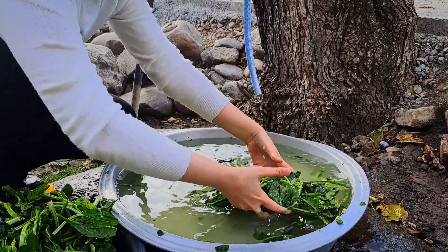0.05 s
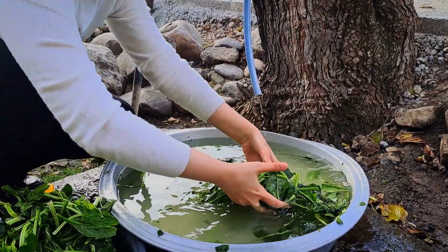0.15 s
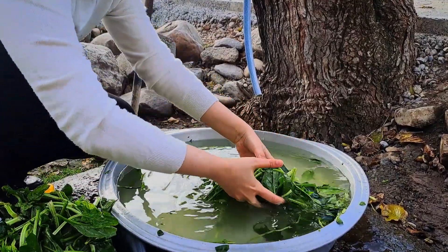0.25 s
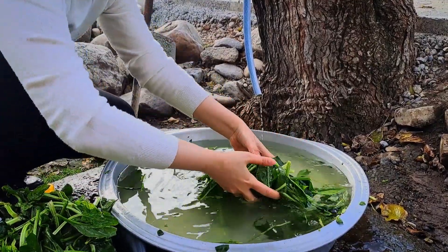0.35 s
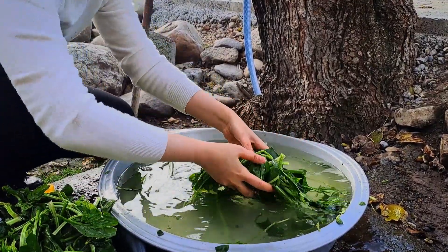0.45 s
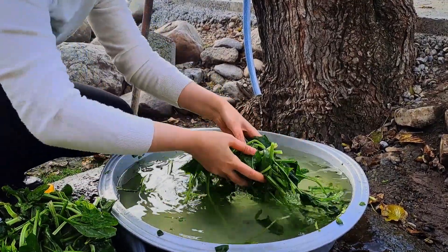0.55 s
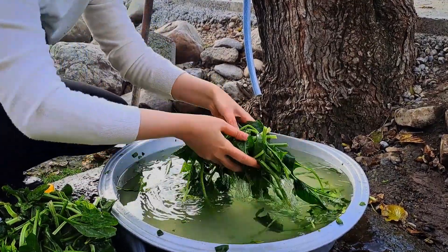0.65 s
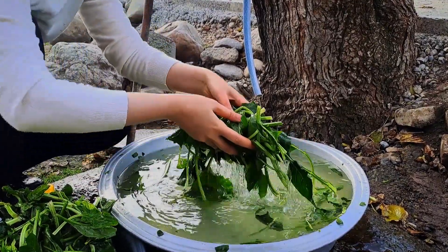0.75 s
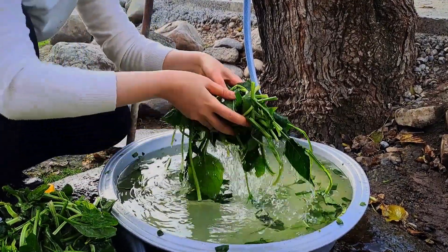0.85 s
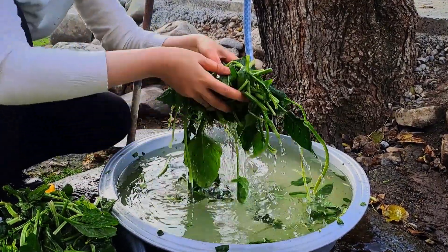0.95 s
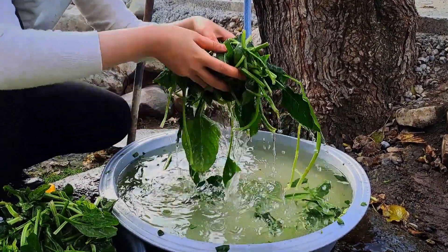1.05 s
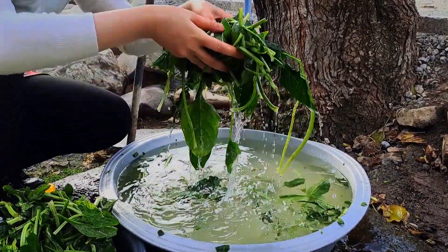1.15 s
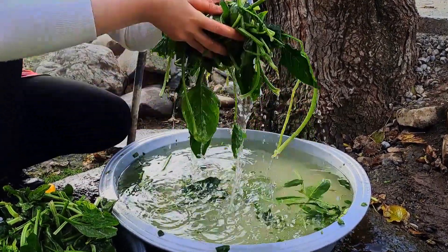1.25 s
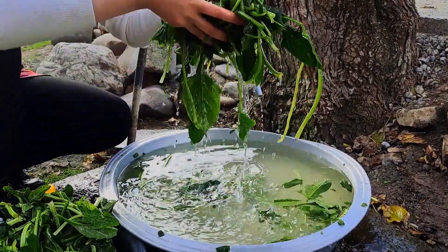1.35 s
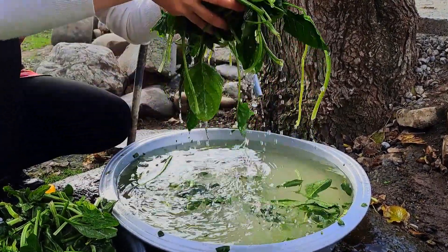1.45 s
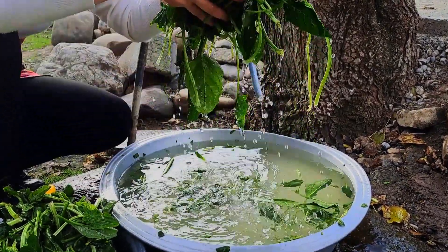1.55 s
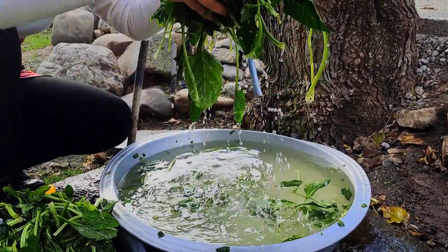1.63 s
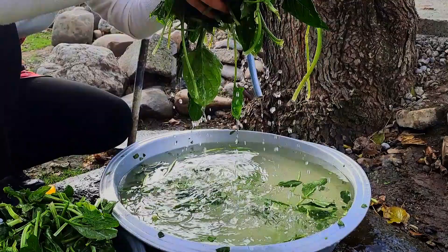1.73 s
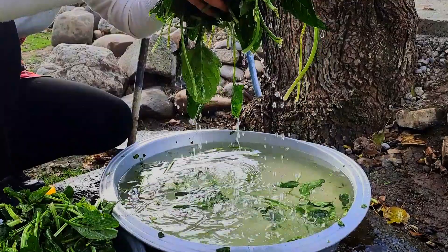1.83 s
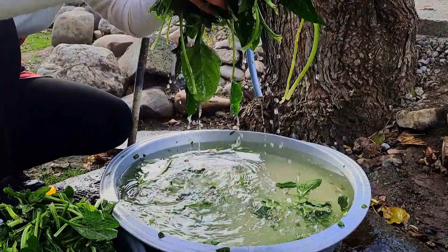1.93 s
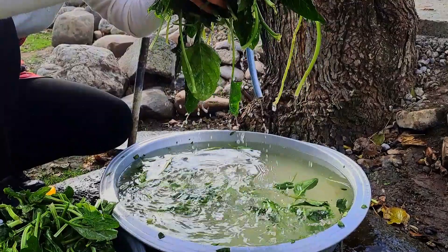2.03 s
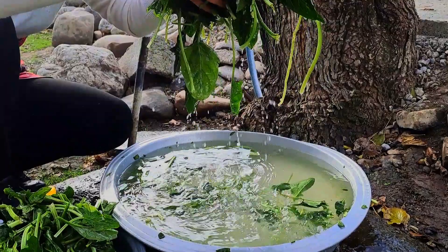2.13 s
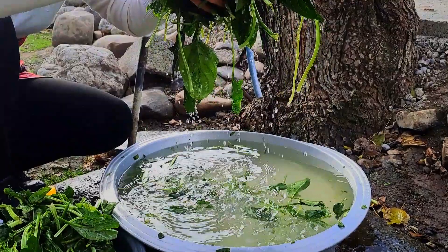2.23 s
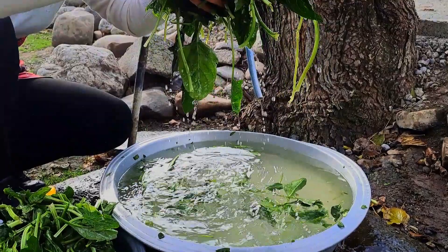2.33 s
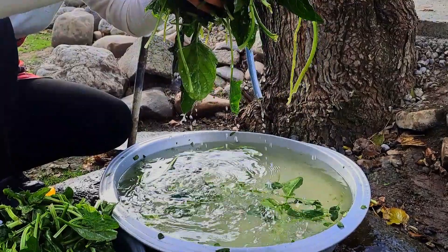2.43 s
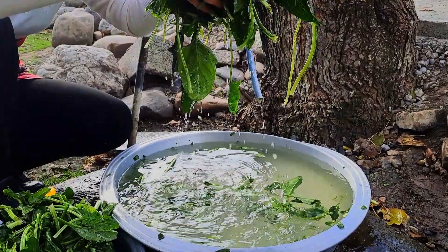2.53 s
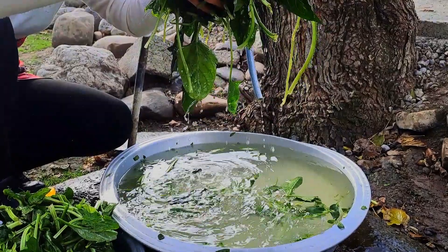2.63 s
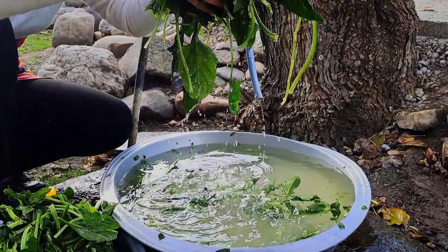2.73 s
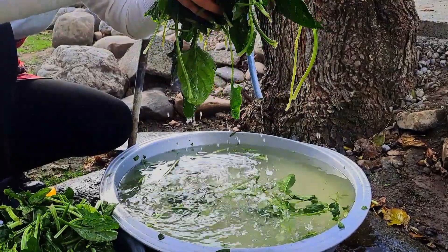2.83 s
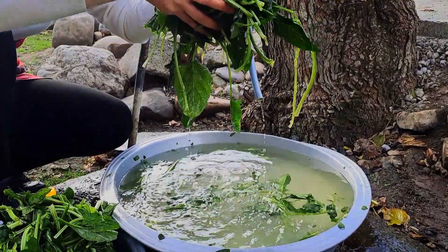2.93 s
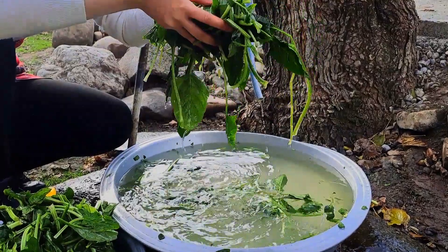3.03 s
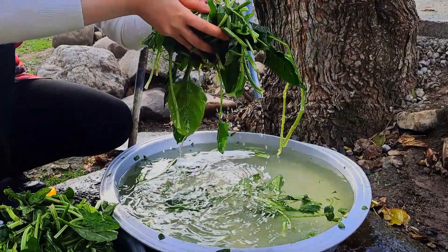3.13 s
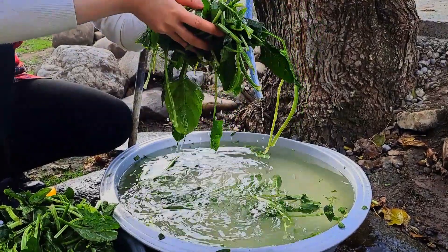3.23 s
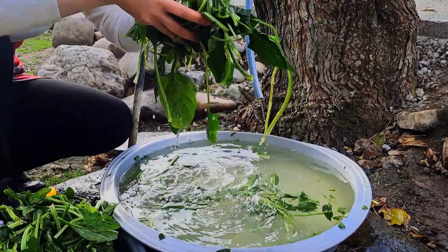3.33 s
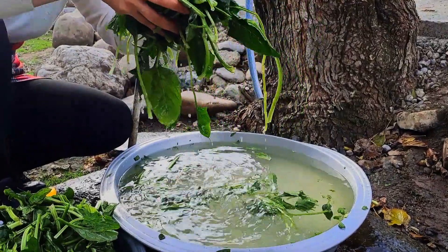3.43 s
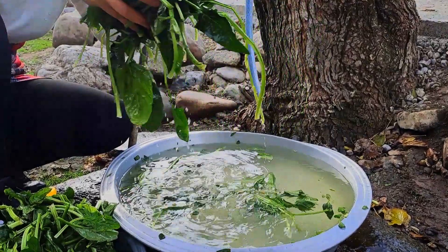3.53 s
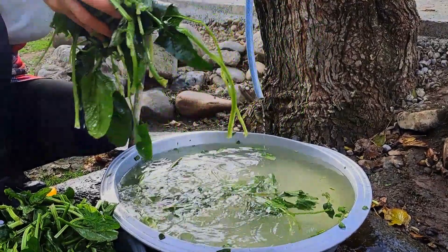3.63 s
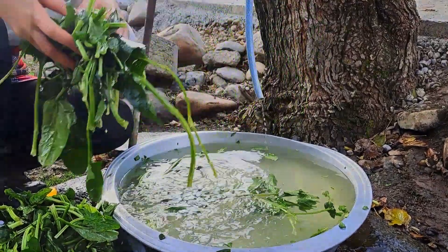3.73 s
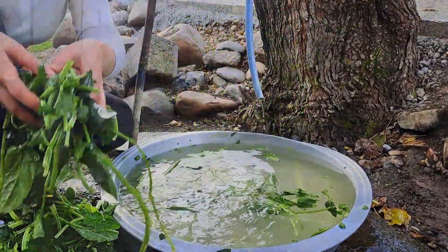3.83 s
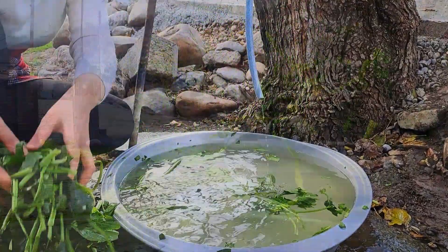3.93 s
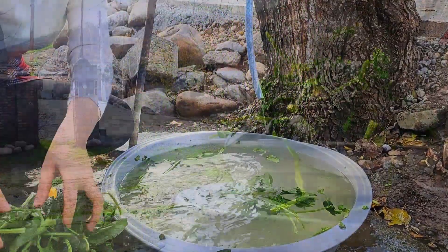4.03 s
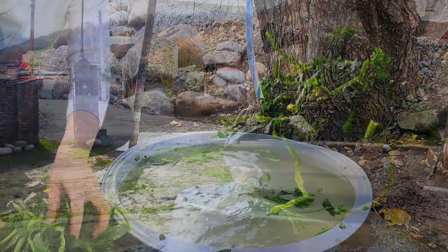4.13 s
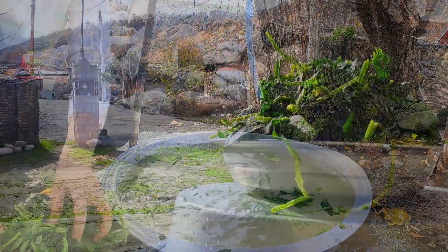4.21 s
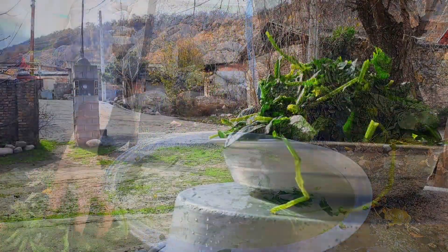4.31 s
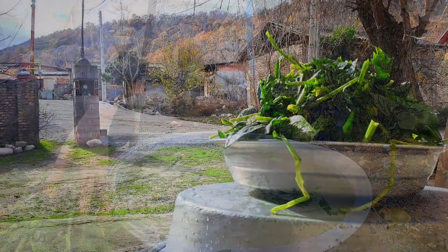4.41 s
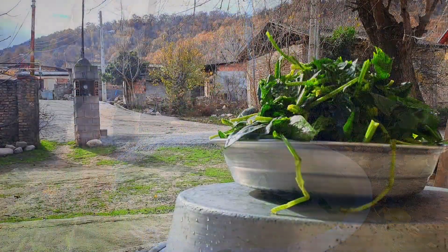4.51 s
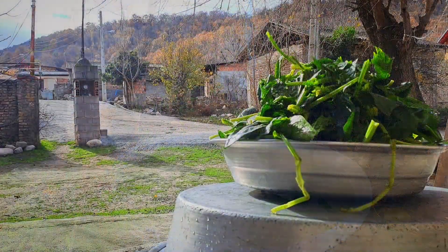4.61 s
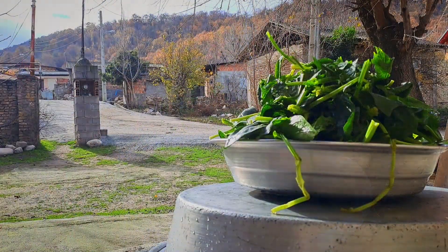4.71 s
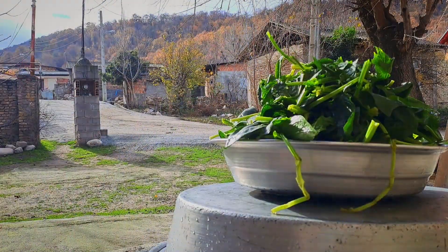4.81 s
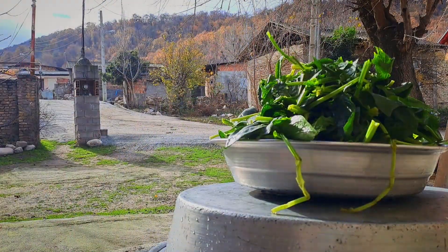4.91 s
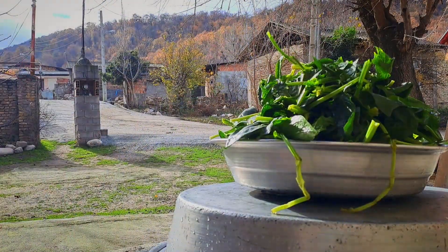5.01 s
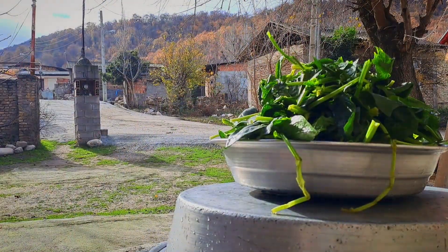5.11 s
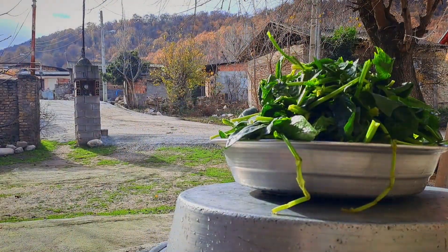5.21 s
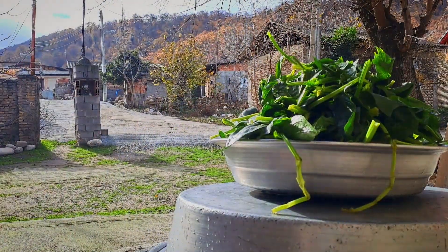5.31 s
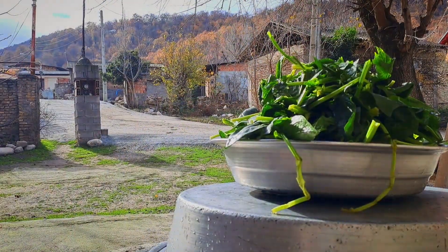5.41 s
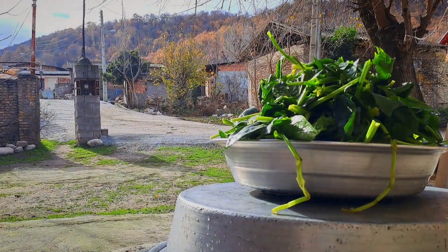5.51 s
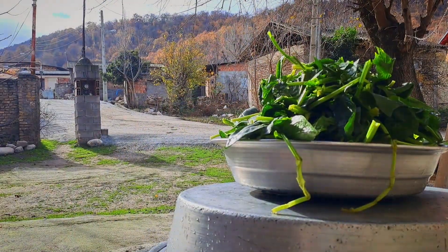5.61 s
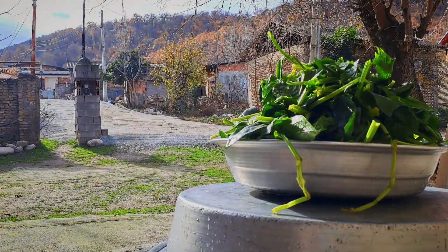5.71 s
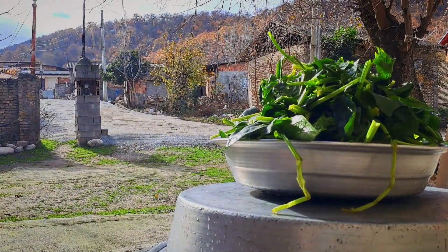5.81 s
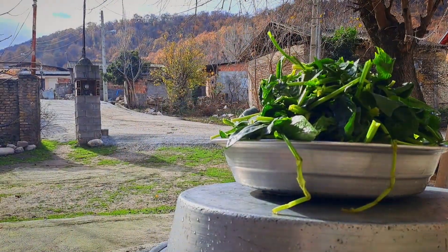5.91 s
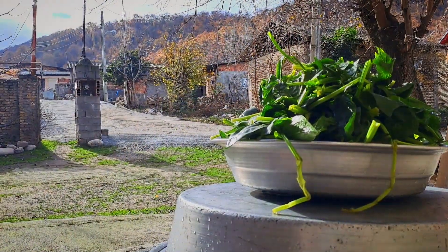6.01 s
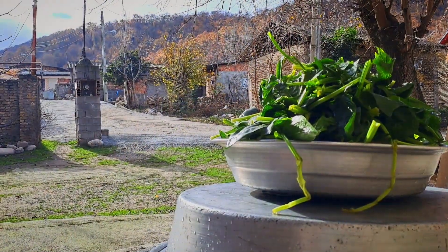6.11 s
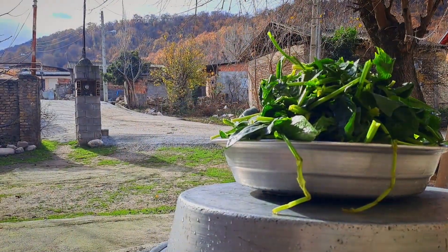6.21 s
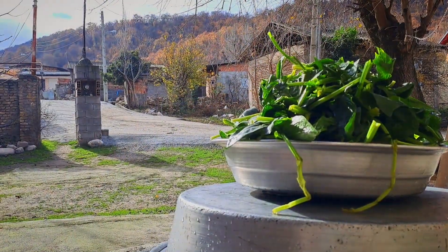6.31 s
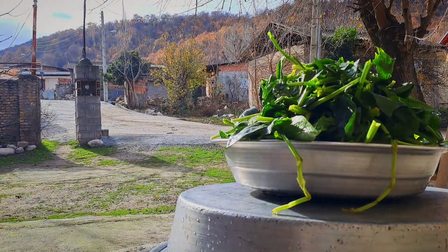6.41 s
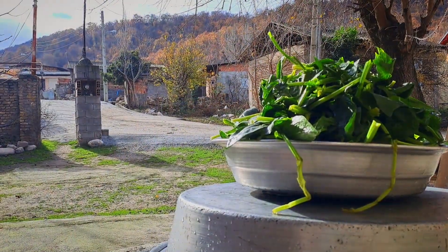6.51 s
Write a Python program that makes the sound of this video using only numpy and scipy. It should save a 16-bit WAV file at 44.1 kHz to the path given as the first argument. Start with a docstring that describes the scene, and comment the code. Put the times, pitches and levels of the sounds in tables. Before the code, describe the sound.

Leafy greens swish in a metal basin outdoors, lift out with streaming, splattering, gurgling water thinning to drips, then flop wetly onto a pile before quiet hum.

```python
"""A bunch of spinach swishes under water in a metal basin, outdoors over a low rumble, and is lifted out.
Water streams off in gushes: noise bursts spatter, sine bubbles gurgle, and resonances ring the basin.
The flow thins to single drips; near 4 s the wet bunch lands on a pile with a flop, rustle and snaps.
Ticks of the settling pile give way to a quiet yard of filtered noise, with a wisp of hiss and one chirp."""
import sys
import numpy as np
from scipy import signal
from scipy.fft import rfft, irfft, next_fast_len
from scipy.io import wavfile
from scipy.ndimage import uniform_filter1d

SR = 44100
rng = np.random.default_rng(int(sys.argv[2]) if len(sys.argv) > 2 else 0)


def dump_mix(stems):
    """Bounce the given channels to the path in sys.argv[1] as a 16-bit WAV at rate SR."""
    frames = np.atleast_2d(stems).T  # one column per channel
    limited = np.clip(frames, -1, 1)  # hard clip at full scale
    pcm = np.round(limited * 32767).astype(np.int16)
    wavfile.write(sys.argv[1], SR, pcm)


N = 289146
T = np.arange(N) / SR  # s


def amp(db):
    """Decibels to gain."""
    return 10 ** (np.asarray(db) / 20)


def evened(x):
    """Scales to rms 1."""
    return x / np.sqrt(np.mean(x ** 2) + 1e-20)


def read(points, hz):
    """Reads a table by frequency on a log axis."""
    f, value = np.transpose(points)
    return np.interp(np.log(hz + 1), np.log(f + 1), value)


def level(rows):
    """A dB curve as gain, fading fast beyond its ends."""
    rows = np.asarray(rows)
    outside = np.maximum(np.maximum(rows[0, 0] - T, T - rows[-1, 0]), 0)
    return amp(np.interp(T, rows[:, 0], rows[:, 1])) * np.exp(-(10 * outside) ** 2)


def swell(s, db, rise_db_per_s, fall_db_per_s):
    """An envelope that climbs to its peak at time s and dies away."""
    drop_db = rise_db_per_s * np.maximum(s - T, 0) + fall_db_per_s * np.maximum(T - s, 0)
    return amp(db - np.minimum(drop_db, 200))


def wander(count, per_s):
    """Random points of rms 1, per_s a second, joined by lines; the last of 512 is held."""
    at = np.arange(count) * per_s / SR
    return np.interp(at, np.arange(512), rng.standard_normal(512))


def colour(x, points):
    """Filters by a spectrum table."""
    size = next_fast_len(N + 4096)
    gain = amp(read(points, np.fft.rfftfreq(size, 1 / SR)))
    return irfft(rfft(x, size) * gain, size)[..., :N]


def resonate(x, hz, q):
    """One resonance, excited by x."""
    return signal.lfilter(*signal.iirpeak(hz, q, fs=SR), x)


def add(mix, s, sound):
    """Mixes a sound in at time s."""
    part = mix[..., max(round(s * SR), 0):][..., :sound.shape[-1]]
    part += sound[..., :part.shape[-1]]


def place(sound, pan_db):
    """Pans a sound, positive to the left; it reaches the left side a few samples late."""
    lag = rng.integers(1, 9)
    left = np.pad(sound, (lag, 0)) * amp(pan_db / 2)
    right = np.pad(sound, (0, lag)) * amp(-pan_db / 2)
    return np.array([left, right])


def bubble(hz, life, glide, fall_db=13, onset=.0006, rough=0.38, wobble=0.031):
    """A bubble rings unevenly in the stirred water; its pitch wobbles and glides by the factor over a life."""
    t = np.arange(int(1.3 * life * SR) + 2) / SR
    age = t / life
    pitch = hz * glide ** (age ** 2) * (1 + wobble * wander(len(t), 120))
    ring = np.sin(2 * np.pi * np.cumsum(pitch) / SR) * (1 + rough * wander(len(t), 250))
    attack = 1 - np.exp(-t / onset)
    release = np.minimum((t[-1] - t) / (life / 2), 1)
    return ring * amp(-fall_db * age ** 1.5) * attack * release


def smack(hz, snap_db, crack=0.001373, spray=0.01, spray_db=-20, q=2.54):
    """A sudden crack of noise and brief spray, ringing a small resonant cavity."""
    t = np.arange(2048) / SR
    decay = np.exp(-t / crack) + amp(spray_db) * np.exp(-t / spray)
    burst = rng.standard_normal(len(t)) * decay
    cavity_hz = min(hz, SR / 3)
    ring = resonate(resonate(burst, cavity_hz, q), cavity_hz, q)
    band = signal.butter(3, [1700, 13000], "band", fs=SR)
    sound = signal.lfilter(*band, evened(ring) + amp(snap_db) * evened(burst))
    return sound / abs(sound).max()


def shower(grains, per_s, spread_db, flow, thinning=0.91, pan_db=3):
    """Grains fall at random times and sizes; a weak flow breaks up into fewer, separate ones."""
    out = np.zeros((2, N))
    density = np.clip((flow / flow.max()) ** thinning, .05, 1)
    for grain in grains:
        placed = place(grain, pan_db * rng.standard_normal())
        placed /= np.linalg.norm(placed)
        draws = rng.random((400, 3))
        for when, size, chance in draws[:int(per_s * N / SR / len(grains))]:
            share = density[int(when * N)]
            if chance < share:
                gain = amp(spread_db * min(-np.log(size), 3)) / np.sqrt(share)  # fewer but stronger
                add(out, when * N / SR, placed * gain)
    return evened(out)


# droplet spectrum: pitch_hz, relative_level_db (per Hz)
SPATTER_SPECTRUM = [(600, -49), (1000, -19.5), (2200, -7.5), (4000, -0.5), (7000, -0.5), (9000, -5),
                    (15500, -1)]


def spatter(gain_db=3.5, fizz_db=-5, gush_db=4.0):
    """Countless droplets pepper the surface in uneven gushes and leave tiny, short-lived bubbles."""
    flow, pitches = falling(), np.geomspace(1800, 15000, 150)
    drops = [smack(hz, snap_db=7, crack=.0008) for hz in pitches]
    ticks = shower(drops, per_s=1300, spread_db=11, flow=flow, thinning=0.73)
    fizz = shower([bubble(hz, 10 / hz, 1.04) for hz in pitches], per_s=450, spread_db=4, flow=flow)
    unevenness = amp(gush_db * wander(N, 98))
    droplets = colour(ticks + amp(fizz_db) * fizz, SPATTER_SPECTRUM)
    return amp(gain_db) * flow * evened(unevenness * droplets)


def gurgle(gain_db=3.5, low_hz=950, high_hz=2800):
    """A dense froth of small bubbles churned under the streams; the larger ones tend to ring longer."""
    flow, pitches = churn(), np.geomspace(low_hz, high_hz, 150)
    grains = [bubble(hz, rng.uniform(8, 34) / hz, rng.uniform(.97, 1.18)) for hz in pitches]
    return amp(gain_db) * flow * shower(grains, per_s=640, spread_db=5.5, flow=flow, thinning=0.43)


def falling(gush_db=-4.5):
    """How much water strikes the surface, from run-off and gushes."""
    return np.hypot(run_off(), amp(gush_db) * gushes())


def churn(runoff_db=-16, power=5.1):
    """How hard the water is stirred: deep by the gushes, and by the run-off while it is strong."""
    flow = run_off()
    return np.hypot(gushes(), amp(runoff_db) * flow * (flow / flow.max()) ** (power - 1))


# water running off the lifted bunch: time_s, relative_level_db
RUNOFF_LEVEL = [(0.45, -72.5), (0.59, -65.5), (0.98, -46), (1.49, -46), (2.42, -44), (2.63, -55.5),
                (3.4, -61.5), (3.63, -68), (3.9, -63.5)]


def run_off():
    """The steady stream off the leaves, as an envelope."""
    return level(RUNOFF_LEVEL)


# pockets of water spilling from between the leaves: peak_s, relative_level_db
GUSH_PEAKS = [(0.649, -59.5), (0.926, -46), (1.07, -48.5), (1.24, -52.5), (1.37, -43.5), (1.489, -49.5),
              (1.72, -54), (1.94, -48), (2.46, -53.5)]


def gushes(rise_db_per_s=214.5, fall_db_per_s=132.5):
    """Every gush swells quickly and drains away, as an envelope."""
    return sum(swell(s, db, rise_db_per_s, fall_db_per_s) for s, db in GUSH_PEAKS)


# the largest air bubbles trapped by falling water, and at 1.42 s a steady ring of the basin near 610 Hz:
# start_s, pitch_hz, relative_peak_db, life_s, pitch_factor (reached after one life)
LARGE_BUBBLES = [(0.7673, 2540, -21.5, 0.0041, 0.89), (0.801, 1300, -37.5, 0.02, 3.5),
                 (0.862, 1236, -37.5, 0.0066, 1.3), (1.056, 806, -49, 0.029, 1.03),
                 (1.055, 1010, -45.5, .025, 1.1), (1.097, 1850, -34.5, 0.04, 1.15),
                 (1.215, 837, -56, 0.11, 1.03), (1.283, 1137, -45.5, 0.019, 0.92),
                 (1.341, 592, -40, 0.067, 1.09), (1.348, 1260, -39.5, 0.013, 1.2),
                 (1.375, 926, -34.5, 0.019, 0.96), (1.418, 1106, -51, .04, 1.03),
                 (1.42, 610, -51.5, 0.12, 1), (1.494, 1390, -36.5, .016, 1.18),
                 (1.639, 846, -44, 0.029, 0.95), (1.71, 730, -47, 0.049, 1.3),
                 (1.741, 900, -39.5, 0.031, 1.18), (1.886, 2170, -14.5, 0.0037, 0.97),
                 (1.927, 1066, -33, 0.014, 2.6), (1.927, 1430, -28, 0.015, 0.98),
                 (1.987, 1070, -43.5, 0.061, 1.8), (2.022, 1656, -32, 0.02, 1.9),
                 (2.06, 700, -51.5, 0.066, .8), (2.124, 1460, -32.5, 0.01, 2.7),
                 (2.127, 624, -44.5, 0.099, 5.9), (2.331, 1197, -37.5, 0.035, 1.7),
                 (2.38, 1067, -33.5, 0.013, 1.6), (2.444, 1850, -30, 0.0082, 1.6),
                 (2.468, 2070, -38, 0.016, 1.2), (2.54, 1123, -46, 0.04, 1.8),
                 (2.585, 1750, -27, .013, 1.51), (2.634, 1620, -35, 0.027, 1.29),
                 (2.736, 1500, -43, 0.023, 0.95), (2.825, 2020, -44.5, 0.0082, 2.6),
                 (2.957, 2450, -33.5, 0.0093, 0.85), (2.962, 1270, -54, 0.05, 0.88),
                 (3.237, 2225, -39.5, 0.013, 7.1), (3.466, 1200, -52.5, 0.051, 1.2),
                 (3.548, 1370, -48, .015, 1.5), (3.687, 1220, -50.5, 0.038, 1.01),
                 (3.851, 1210, -59, 0.025, 1.06), (4.432, 1405, -55, 0.017, 1.1),
                 (4.518, 1400, -57.5, 0.01, 1.04)]


def plinks(pan_db=0.0, burst_db=-11):
    """The large single bubbles, each pinched off with a small tick."""
    out = np.zeros((2, N))
    for s, hz, db, life, glide in LARGE_BUBBLES:
        add(out, s, amp(db) * place(bubble(hz, life, glide), pan_db))
        add(out, s, amp(db + burst_db) * place(smack(2 * hz, -10.0), pan_db))
    return out


# the largest drops smacking on water and leaves: start_s, relative_peak_db, ring_hz
LARGE_DROPS = [(0.167, -44, 8000), (0.713, -31, 2400), (0.7989, -23.5, 5220), (0.8906, -34, 4540),
               (1.042, -22, 2600), (1.0535, -24, 3320), (1.119, -27.5, 5140), (1.2367, -25.5, 2250),
               (1.293, -14, 6860), (1.3416, -19, 3130), (1.365, -21.5, 2860), (1.409, -18.5, 4550),
               (1.413, -20, 5960), (1.4718, -23, 6150), (1.5285, -18.5, 5440), (1.5676, -20.5, 4050),
               (1.5785, -24.5, 2440), (1.5908, -17, 9400), (1.6805, -27, 4260), (1.6955, -17, 3060),
               (1.779, -26.5, 7700), (1.8866, -18, 2570), (1.9164, -20, 6000), (1.9835, -32, 6900),
               (2.071, -21.5, 2550), (2.1556, -23, 3740), (2.228, -23, 7700), (2.288, -29.5, 4330),
               (2.307, -25, 11800), (2.3473, -26, 3850), (2.4407, -23.5, 3000), (2.4542, -20, 3540),
               (2.48, -24, 7000), (2.4916, -27, 3930), (2.631, -20.5, 7870), (2.737, -38, 2330),
               (2.905, -32, 9150), (2.937, -33.5, 3350), (3.0199, -25, 6300), (3.114, -38.5, 4270),
               (3.2459, -29.5, 6440), (3.289, -26, 3470), (3.327, -28.5, 6770), (3.459, -40.5, 4660),
               (3.5123, -35.5, 3700), (3.565, -26, 7130), (3.6536, -35, 7940), (3.7957, -40, 6800),
               (4.6097, -56, 2390)]
# low drops sit to the left, middle ones furthest right, high ones nearer: ring_hz, left_over_right_db
DROP_PAN = [(2200, 7), (4500, -9), (8000, -5)]


def drips(droplet_db=-14, lag=0.02, snap_db=-2.5, snap_db_per_octave=3, middle_hz=4500, crack=.001):
    """Large drops throw up droplets that fall just after; high ones are shorter and snap more than they ring."""
    out = np.zeros((2, N))
    for s, db, hz in LARGE_DROPS:
        snap = snap_db + snap_db_per_octave * np.log2(hz / middle_hz)
        pan = read(DROP_PAN, hz)
        drop = smack(hz, snap, crack * np.sqrt(middle_hz / hz))
        add(out, s, amp(db) * place(drop, pan))
        for when, size, tone in rng.random((3, 3)):
            droplet = smack(hz * 2 ** (tone - .5), snap)
            add(out, s + when * lag, amp(db + droplet_db - 10 * size) * place(droplet, pan))
    return out


# hands swishing under the water, then the wet bunch seeping: time_s, relative_level_db
SWISH_LEVEL = [(0, -69.5), (.3, -63), (.55, -60.5), (.95, -49), (2.5, -55.5), (3.1, -69), (4.2, -62)]
# swish spectrum: pitch_hz, relative_level_db (per Hz)
SWISH_SPECTRUM = [(500, -11.5), (2500, -5), (6500, 1), (9000, -1.5), (15000, -11.5)]


def swish(hollow_hz=1200, hollow_q=7, hollow_db=5, stir_db=4.5):
    """Water slides unevenly over the leaves, with a soft hollow note from water cupped between the hands."""
    hiss = colour(rng.standard_normal((2, N)), SWISH_SPECTRUM)
    hollow = resonate(hiss[1], hollow_hz, hollow_q)
    unevenness = amp(stir_db * wander(N, 45))
    return level(SWISH_LEVEL) * evened((hiss + amp(hollow_db) * hollow) * unevenness)


# modes of the metal basin: pitch_hz, relative_level_db
BASIN_MODES = [(604, -11.5), (934, -17), (1154, -4), (1402, -14), (2067, -2)]


def basin(x, ring_db=-8, width_hz=28):
    """Water striking the surface sets the metal basin ringing faintly."""
    return x + amp(ring_db) * sum(amp(db) * resonate(x, hz, hz / width_hz) for hz, db in BASIN_MODES)


def slosh(gain_db=-13, power=1.3):
    """The heaviest streams stir the water deep enough to sound the basin's modes."""
    stir = rng.standard_normal(N) * amp(4.85 * wander(N, 35))
    depth = churn()
    modes = sum(amp(db) * resonate(stir, hz, 24) for hz, db in BASIN_MODES)
    return amp(gain_db) * depth * (depth / depth.max()) ** (power - 1) * evened(modes)


# crackle spectrum: pitch_hz, relative_level_db (per Hz)
CRACKLE_SPECTRUM = [(500, 29), (1500, -5), (3500, -2), (5600, -3.5), (7200, -1), (10000, -9), (16000, -4)]


def leaves(crackle_db=-1.0, clump_db=1.5, press_s=4.042, grip_db_per_s=126):
    """Hands press the leaves down; stems and leaves crackle more sparsely as the pile slowly settles."""
    press = swell(press_s, -45.5, grip_db_per_s, 101.5)
    settle = swell(press_s, -58.5, grip_db_per_s, 22.5)
    rustle = press + settle
    grains = [smack(hz, 2, crack=.0005, spray_db=-28) for hz in np.geomspace(1200, 14000, 60)]
    crackle = shower(grains, per_s=1700, spread_db=4.0, flow=rustle, thinning=0.11)
    clumps = amp(clump_db * wander(N, 75))
    return amp(crackle_db) * rustle * evened(colour(crackle, CRACKLE_SPECTRUM) * clumps)


# the wet bunch lands in two parts: peak_s, relative_level_db
LANDINGS = [(3.953, -42.5), (3.972, -45.5)]
# flop spectrum: pitch_hz, relative_level_db (per Hz)
FLOP_SPECTRUM = [(60, 19), (180, 22.8), (1200, 19.6), (2300, 21.7), (4000, 10), (12000, 0.57)]


def flop(gain_db=-1, landing_db_per_s=12000, slap_db_per_s=898, sag_db=-2.5, sag_db_per_s=87):
    """Each part of the wet bunch lands with a dull slap of dense clicks, the last with a softer sag."""
    slap = sum(swell(s, db, landing_db_per_s, slap_db_per_s) for s, db in LANDINGS)
    last_s, last_db = LANDINGS[-1]
    sag = swell(last_s, last_db + sag_db, landing_db_per_s, sag_db_per_s)
    clicks = rng.standard_normal(N) * (rng.random(N) < 3000 / SR)  # about 3000 a second
    return amp(gain_db) * (slap + sag) * evened(colour(clicks, FLOP_SPECTRUM))


# stems snapping as the bunch lands, then ticking as the pile settles: start_s, relative_peak_db
STEM_SNAPS = [(3.9515, -33.5), (4.0345, -45), (4.0995, -27), (4.1315, -26.5), (4.288, -63), (4.454, -55.5),
              (4.5742, -51), (4.761, -53.5), (4.863, -53)]


def snaps(low_hz=3800, high_hz=7500, low_db=-7, pan_db=-3, snap_db=-9, crack=0.00053, spray_db=-28):
    """Single crisp stems give way with a short, dry crack that rings at two pitches."""
    out = np.zeros((2, N))
    for s, db in STEM_SNAPS:
        low, high = (smack(hz, snap_db, crack, spray_db=spray_db) for hz in (low_hz, high_hz))
        add(out, s, amp(db) * place(high + amp(low_db) * low, pan_db))
    return out


# tone of the left side of water and leaves: pitch_hz, left_gain_db
LEFT_SHADE = [(2000, -1), (4500, -5.5), (9000, -7), (14000, 0)]


def shade(x):
    """Dulls the left side so that the sound leans to the right."""
    return np.array([colour(x[0], LEFT_SHADE), x[1]])


def surroundings(x, rim_db=-10, rim_t60=0.052, yard_db=-19, yard_t60=0.23):
    """Quick reflections from the basin's rim, and a faint tail from stones and trunk."""
    t = np.arange(SR // 3) / SR
    rim, yard_tail = rng.standard_normal((2, 2, len(t)))
    rim *= amp(-60 * t / rim_t60) * (t > .0006)
    yard_tail *= amp(-60 * t / yard_t60) * (t > .006)
    echo = amp(rim_db) * rim / np.linalg.norm(rim[0])
    echo += amp(yard_db) * yard_tail / np.linalg.norm(yard_tail[0])
    return x + signal.fftconvolve(x, echo, axes=1)[:, :N]


# likeness of the two sides of far-off sound: pitch_hz, correlation (no unit)
SIDE_LIKENESS = [(200, 0.94), (600, 0.2)]


def distant(spectrum, swell_db):
    """Far-off noise that swells a little, closely alike on both sides in the bass only."""
    a, b = rfft(rng.standard_normal((2, N)))
    same = np.clip(read(SIDE_LIKENESS, np.fft.rfftfreq(N, 1 / SR)), -1, 1)
    sides = irfft(np.array([a, same * a + np.sqrt(1 - same ** 2) * b]), N)
    return evened(colour(sides, spectrum) * amp(swell_db * wander(N, 8)))


# rumble by the basin: time_s, level_db
RUMBLE_CURVE = [(0, -59), (1.5, -53), (2.6, -54), (4.2, -59), (4.8, -75)]
# rumble spectrum: pitch_hz, relative_level_db (per Hz)
RUMBLE_SPECTRUM = [(20, -38), (42, -9), (56, -2), (75, -5), (95, -13), (155, -14), (250, -25.5), (500, -35),
                   (1200, -64.5), (4000, -79)]


def rumble():
    """Low noise, mostly below 200 Hz, that sinks away as the yard comes in."""
    return level(RUMBLE_CURVE) * distant(RUMBLE_SPECTRUM, swell_db=1.5)


# hum of the yard: time_s, level_db
YARD_CURVE = [(3.6, -73), (4.4, -62.5), (5, -60), (6.5, -59.5)]
# yard spectrum: pitch_hz, relative_level_db (per Hz)
YARD_SPECTRUM = [(30, -47), (62, -4), (100, -10), (135, 1), (225, -6), (280, -1), (370, -10.5), (600, -8),
                 (950, -29), (1600, -35), (4000, -37), (8000, -48.5), (16000, -62)]


def yard():
    """The quiet yard's hum: steady noise with broad peaks in the bass and low middle."""
    return level(YARD_CURVE) * distant(YARD_SPECTRUM, swell_db=0.5)


# a faint, brief swell of hiss in the yard: peak_s, level_db
HISS_WISP = (5.858, -78)


def wisp(rise_db_per_s=700, fall_db_per_s=110):
    """A little soft band-passed hiss comes and goes over the yard's hum."""
    band = signal.butter(3, [2500, 7200], "band", fs=SR)
    hiss = signal.lfilter(*band, rng.standard_normal((2, N)))
    return swell(*HISS_WISP, rise_db_per_s, fall_db_per_s) * evened(hiss)


# a far-off chirp: start_s, length_s, first_hz, last_hz, peak_db
CHIRP = (6.41, .13, 8600, 6900, -91)


def bird():
    """One thin, quickly falling chirp from far off in the yard: a sine with a trembling pitch."""
    s, length, first_hz, last_hz, db = CHIRP
    age = np.clip((T - s) / length, 0, 1)
    tremble = 150 * evened(uniform_filter1d(rng.standard_normal(N), 60))  # Hz
    pitch = first_hz + (last_hz - first_hz) * age + tremble
    return amp(db) * np.sin(np.pi * age) * np.sin(2 * np.pi * np.cumsum(pitch) / SR)


def scene():
    """Water and leaves slightly to the right, in the open air."""
    water = basin(spatter() + gurgle() + plinks()) + slosh() + swish()
    near = shade(water + leaves() + flop()) + drips() + snaps()
    return surroundings(near) + rumble() + yard() + wisp() + bird()


def record(dry, edge_hz=16100):
    """A steep low-pass closes the top of the band."""
    lowpass = signal.firwin(511, edge_hz, window=("kaiser", 9), fs=SR)
    return signal.oaconvolve(dry, lowpass[None], "same")


dry = scene()
out = record(dry)
dump_mix(out)
```